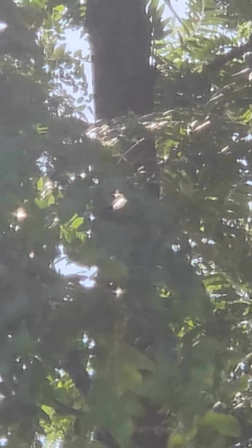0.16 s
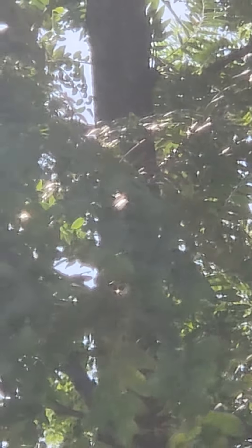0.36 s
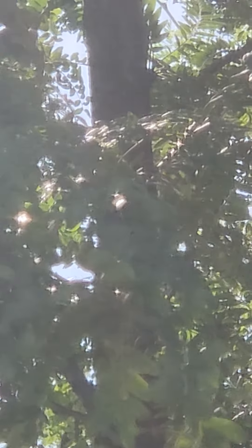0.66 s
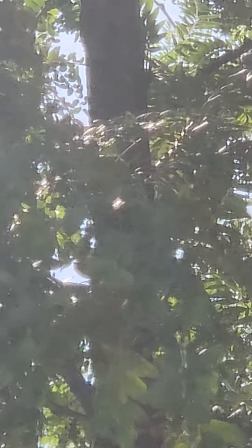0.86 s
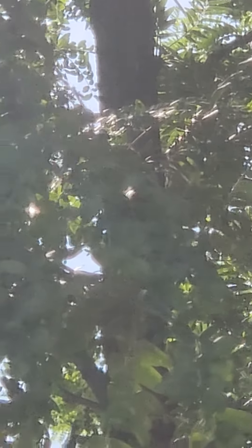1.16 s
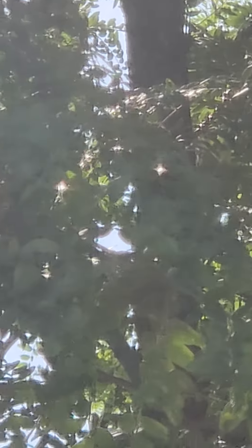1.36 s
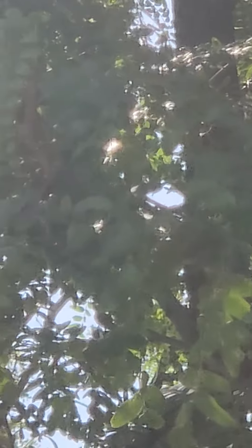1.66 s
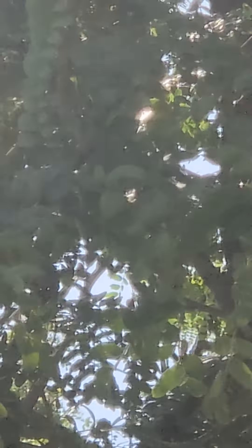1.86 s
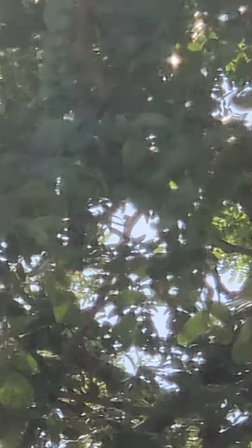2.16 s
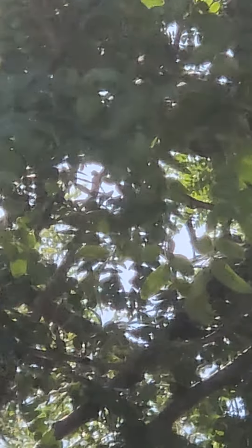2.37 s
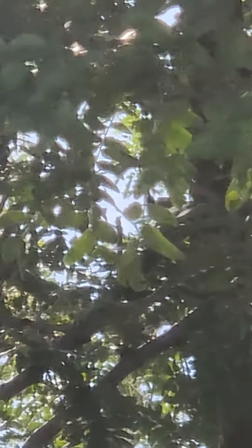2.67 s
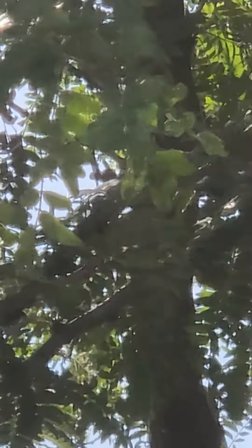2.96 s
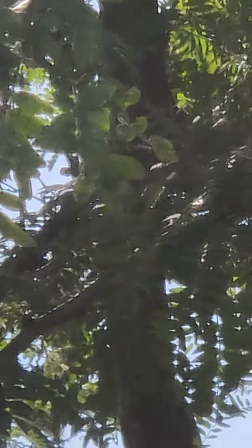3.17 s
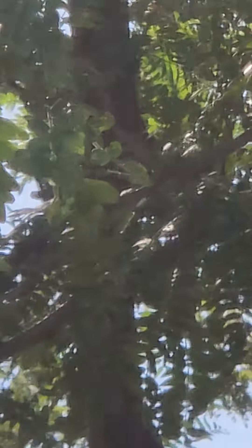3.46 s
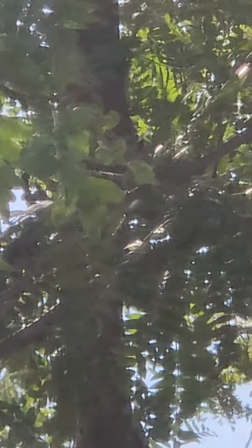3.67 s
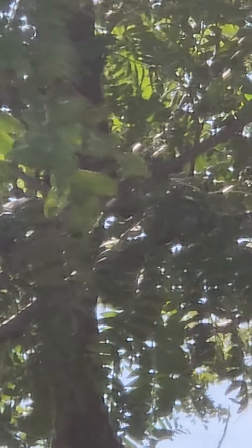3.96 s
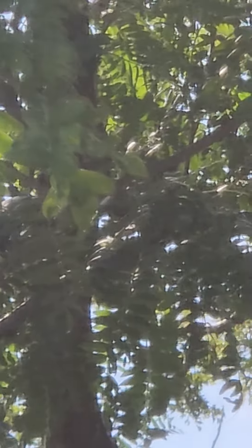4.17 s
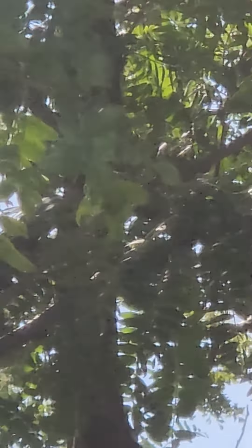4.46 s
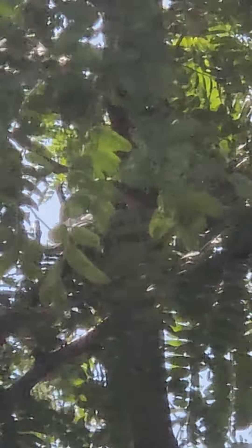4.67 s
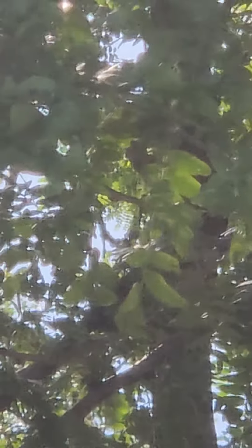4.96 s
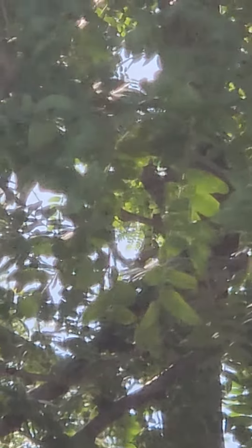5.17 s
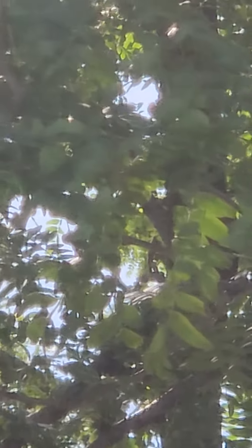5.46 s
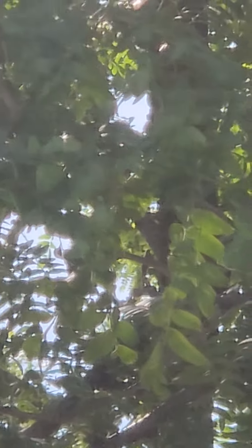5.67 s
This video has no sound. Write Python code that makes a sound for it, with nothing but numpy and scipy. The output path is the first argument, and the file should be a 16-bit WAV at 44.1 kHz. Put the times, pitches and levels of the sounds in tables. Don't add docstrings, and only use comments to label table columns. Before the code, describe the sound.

A close cricket chirps over soft low traffic rumble and a pulsing haze of insects, with a few faint piped bird notes. A jay then screams harshly at about one second, twice more around three, and once near the end, each call trailing into woodland scatter. Twigs snap around two seconds. Close stereo microphone among trees, turning slightly.

```python
import sys
import numpy as np
from scipy import signal
from scipy.fft import rfft, irfft
from scipy.io import wavfile
from scipy.ndimage import uniform_filter1d, minimum_filter1d

SR = 44100
rng = np.random.default_rng(int(sys.argv[2]) if len(sys.argv) > 2 else 0)


def transcribe(signal):
    frames = np.atleast_2d(signal).T
    limited = np.clip(frames, -1, 1)
    pcm = np.round(limited * 32767).astype(np.int16)
    wavfile.write(sys.argv[1], SR, pcm)


def natural_amplitude(level_db):
    exponent = np.asarray(level_db, float) / 20
    return 10 ** exponent


N = 256220


def at_hz(points, hz, column=1):
    points = np.array(points)
    return np.interp(np.log(np.maximum(hz, 1)), np.log(points[:, 0]), points[:, column])


def at_s(points, t):
    return np.interp(t, *np.transpose(points))


def rms_one(x):
    return x / np.sqrt(np.mean(x ** 2) + 1e-20)


def drift(rate, shape):
    t = np.arange(shape[-1]) * rate / SR
    knots = rng.standard_normal((*shape[:-1], 400))
    whole = t.astype(int) % 399
    part = t % 1
    return knots[..., whole] * (1 - part) + knots[..., whole + 1] * part


def panned(x, pan_db):
    return np.array([x * natural_amplitude(pan_db / 2), x * natural_amplitude(-pan_db / 2)])


def resonance(x, hz, width_hz):
    r = np.exp(-np.pi * width_hz / SR)
    zeros = np.array([1, 0, -1]) * (1 - r * r) / 2
    return signal.lfilter(zeros, [1, -2 * r * np.cos(2 * np.pi * hz / SR), r * r], x)


def double_resonance(x, hz, width_hz):
    return resonance(resonance(x, hz, width_hz), hz, width_hz)


CHIP_S = .007


def controls(scream, voice, chip_hz):
    start, end, second_db, pan_db, turn = scream
    t = np.arange(start, min(end, (N - 1) / SR), 1 / SR)
    s, *columns = np.transpose(voice)
    pitch_hz, effort_db, ring_db, rasp_db = [np.interp(t, s, c) for c in columns]
    unsettled = np.clip(1 - (t - start - CHIP_S) / .01, 0, 1)
    pitch_hz = pitch_hz + (chip_hz - pitch_hz) * unsettled
    rasp_db = rasp_db + (-11.0 - rasp_db) * np.sqrt(unsettled)
    effort_db = effort_db - 31 * np.clip(1 - (t - start) / 0.00073, 0, 1)
    shut_db = -20.5 * np.clip(1 - (end - t) / 0.02, 0, 1)
    clean_db = effort_db + shut_db - 10 * np.log10(1 + natural_amplitude(2 * rasp_db))
    fourth_db = effort_db + ring_db
    late_db = -14.5 * unsettled + shut_db
    second_db = second_db + 0.28 * (fourth_db - np.median(fourth_db)) + late_db
    return (t, pitch_hz, second_db, fourth_db + late_db, clean_db, clean_db + rasp_db,
            pan_db + turn * (t - start), unsettled)


def chaotic_swing(count, cycles):
    memory, beat_share = .62, .33
    own = rng.standard_normal((count, 500)) + 1j * rng.standard_normal((count, 500))
    own = signal.lfilter([np.sqrt(1 - memory ** 2)], [1, -memory], own)
    beat = rms_one(signal.lfilter([1], [1, .9, .9], rng.standard_normal(500)))
    swing = np.sqrt((1 - beat_share) / 2) * own + np.sqrt(beat_share) * beat
    whole, part = cycles.astype(int), cycles % 1
    return swing[:, whole] * (1 - part) + swing[:, whole + 1] * part


# (time [s], slip [Hz], width [s])
PITCH_SLIPS = [(1.162, -16.5, 0.0083), (1.259, -9, 0.032), (2.951, -17.5, 0.017), (3.012, 8.5, 0.007),
               (5.493, -8.5, 0.017), (5.522, 18, .015)]
# (time [s], level [dB])
DOUBLING = [(1.12, -75.5), (1.14, -52), (1.235, -45.5), (1.27, -74), (3.65, -72), (3.67, -54.5),
            (3.77, -44.5), (3.8, -67)]
# (frequency [Hz], level [dB])
RASP_COLOUR = [(2000, 6.5), (3000, 5.5), (4500, 6.5), (5500, -3), (8500, -2), (14000, -4)]


def call(course, throat, lead_s, shake_db=4.0):
    t, pitch_hz, second_db, fourth_db, stack_db, rasp_db, pan_db, unsettled = course
    wobble_db = 4.5
    pitch_hz = pitch_hz + sum(hz * np.exp(-((t - at) / width) ** 2) for at, hz, width in PITCH_SLIPS)
    chaos = np.clip(.12 + natural_amplitude(rasp_db - stack_db), 0, 2)
    steady = np.cumsum(pitch_hz * (1 + 0.00091 * drift(43.8, t.shape))) / SR
    cycles = steady + np.cumsum(pitch_hz * .008 * chaos * drift(160, t.shape)) / SR

    orders = np.arange(2, 27)[:, None]
    audible = orders * pitch_hz < .45 * SR
    phases = orders * cycles + rng.random(orders.shape)
    turns = audible * np.exp(2j * np.pi * phases) * np.sqrt(2)
    swing = chaotic_swing(len(orders), cycles)
    doubling = natural_amplitude(at_s(DOUBLING, t) + 15.5) * np.cos(np.pi * cycles)
    rasp_gain = natural_amplitude(rasp_db + 7.0 + wobble_db / 2 * drift(39.1, turns.shape))
    rasp = (turns * (rasp_gain * swing + doubling)).real.sum(0)

    second_gain = natural_amplitude(second_db + wobble_db / 3 * drift(30, t.shape))
    second = second_gain * np.sqrt(2) * np.cos(4 * np.pi * steady)
    shaken = 1 + natural_amplitude(shake_db + rasp_db - fourth_db) * swing[2]
    ringing = np.sqrt(2) * np.exp(4j * np.pi * (steady + cycles))
    fourth_gain = natural_amplitude(fourth_db + wobble_db / 3 * drift(53, t.shape))
    fourth = panned(fourth_gain * (shaken * ringing).real, pan_db)

    chip = np.sin(np.pi * np.clip((t - t[0]) / (CHIP_S + .003), 0, 1))
    chip = chip * ((orders == 8) + .6 * (abs(orders - 8) == 2))
    odd_mute_db = -20 * unsettled * (orders % 2)
    others = ((orders != 2) & (orders != 4)) * natural_amplitude(odd_mute_db + 14 * chip)

    hz = np.fft.rfftfreq(len(t), 1 / SR)
    windpipe = 1 / (1 + (2080 / np.maximum(hz, 1)) ** 14)
    out = np.zeros((2, len(t)))
    for side in range(2):
        leaves = natural_amplitude(wobble_db * drift(29.5, turns.shape))
        stack = (others * turns.real * leaves).sum(0) * natural_amplitude(stack_db + 1.0)
        source = rfft(stack) + rfft(rasp) * natural_amplitude(at_hz(RASP_COLOUR, hz))
        coloured = source * windpipe * natural_amplitude(at_hz(throat, hz, column=1 + side)) + rfft(fourth[side])
        late = -2j * np.pi * hz * lead_s * side
        low = rfft(second) * np.exp(late * 0.72)
        out[side] = irfft(coloured * np.exp(late) + low, len(t))
    return round(t[0] * SR), out


# (start [s], end [s], 2nd partial [dB], throat ring left-right at start [dB], head turn [dB/s])
SCREAMS = [
    (1.0598, 1.497, -38.5, 1, 12),
    (2.848, 3.233, -36.5, -11.5, 34),
    (3.5783, 3.974, -30.5, -7.5, 19),
    (5.419, 5.824, -33.5, -12, 18),
]
# (time [s], cycle rate [Hz], effort [dB], throat ring over effort [dB], rasp over clean partials [dB])
VOICE_1 = [(1.082, 796, -37, 23.5, 1), (1.109, 815, -33.5, 20, -13), (1.2, 808, -36, 22.5, -14),
           (1.27, 790.7, -30, 16.5, -22), (1.32, 781, -29.5, 17.5, -8), (1.402, 772.5, -32.5, 5.5, -5.5),
           (1.448, 736.5, -34.5, 20, -1.5), (1.478, 742, -47, 29.5, 3)]
VOICE_2 = [(2.871, 805, -37, 16, 5.5), (2.885, 831, -31, 18.5, -3), (2.92, 822, -39, 13, -15.5),
           (2.97, 813, -36, 24.5, -16.5), (3.075, 780, -32, 11, -24.5), (3.095, 777, -31.5, 7.5, 0),
           (3.17, 765.4, -32.5, 9, 18), (3.214, 731, -38, 17, 13.5)]
VOICE_3 = [(3.6, 803, -36, 21, 5), (3.619, 815.5, -31, 22, -31), (3.653, 804.5, -33.5, 25.7, -16),
           (3.681, 816, -34.5, 25.5, -7.5), (3.788, 785.4, -27.5, 10.5, -9), (3.812, 775, -31, 5.4, -7),
           (3.912, 765.6, -33.5, 5.2, 3), (3.96, 721, -39, 15.6, 32.5)]
VOICE_4 = [(5.439, 823, -31.5, 15, 5), (5.46, 833, -23.5, 13.5, -15), (5.53, 812.4, -29.5, 16.7, -29.5),
           (5.607, 783, -28.5, 11.8, -34.5), (5.627, 779.5, -27.5, 12.6, -11),
           (5.712, 784.7, -29.5, 9.1, 3), (5.772, 752, -32, 15, 15), (5.797, 709.5, -39.5, 13, 38)]
CHIP_HZ = [622, 612, 665, 595]
# (frequency [Hz], left [dB], right [dB])
THROATS = [
    [(2130, 1, -5), (2360, -2, 4), (3660, -5, -2), (5300, -8.5, 0), (8000, 3.5, 3.5), (9000, -44, -1),
     (11200, -11, -10.5), (15800, -11, -9)],
    [(2030, -4.5, -24), (2300, -4, 1), (4000, -5.5, -3.5), (4720, -16.5, 0), (7060, 4.5, 0.5),
     (8370, -7.5, -0.5), (11730, -17.5, -4.5), (15200, -16, -3.5)],
    [(2400, -1, 3), (4200, -1.5, 0), (4914, -19, 3.5), (5560, -3, -8), (7740, 7, -7), (7970, -21.5, 11.5),
     (11600, -23.5, -3.5), (15500, -28, -4)],
    [(2260, -3, 1), (4060, -8.5, -5), (5530, -20.5, -11), (6390, 2, -58), (7170, -25, 8), (7760, -10, 4),
     (10600, -31, -4), (15170, -19, -14)],
]
LEFT_LEADS_S = [0.0001687, 0.00022, 0.00024, 0.00021]


def jay():
    out = np.zeros((2, N))
    voices = (VOICE_1, VOICE_2, VOICE_3, VOICE_4)
    for scream, voice, chip_hz, throat, lead_s in zip(SCREAMS, voices, CHIP_HZ, THROATS, LEFT_LEADS_S):
        start, sound = call(controls(scream, voice, chip_hz), throat, lead_s)
        out[:, start:start + sound.shape[1]] += sound
    return out


# (frequency [Hz], 60 dB decay [s])
WOOD_T60 = [(1000, 0.577), (2300, 0.47), (3100, 1.15), (4500, 0.55), (7000, 0.33), (12000, 0.22)]


def woodland(x, far_db=-22.5):
    t = np.arange(SR) / SR
    near = rms_one(natural_amplitude(-60 * t / .12))
    echo = natural_amplitude(-22) * near * rng.standard_normal((2, SR))
    edges = np.geomspace(900, 16000, 13)
    for low, high in zip(edges, edges[1:]):
        bandpass = signal.butter(2, [low, high], "band", fs=SR, output="sos")
        band = signal.sosfilt(bandpass, rng.standard_normal((2, SR)))
        decay = rms_one(natural_amplitude(-60 * t / at_hz(WOOD_T60, np.sqrt(low * high))))
        echo = echo + natural_amplitude(far_db) * band * decay
    return signal.fftconvolve(x[[1]], echo / np.sqrt(SR), axes=1)[:, :N]


def note(length_s, from_hz, to_hz):
    u = np.linspace(0, 1, round(length_s * SR))
    swell = np.sin(np.pi * u) ** .6
    return swell * np.sin(2 * np.pi * np.cumsum(from_hz + (to_hz - from_hz) * u) / SR)


# (time [s], peak level [dB], stroke spacing [s])
CHIRPS = [(.012, -59.5, 0.037), (0.318, -54, 0.036), (0.611, -56.5, .039), (.917, -58.5, 0.036),
          (1.532, -54.5, 0.039), (2.131, -56, 0.04), (2.409, -54.5, 0.043), (2.694, -51, 0.043),
          (3.435, -49, .039), (4.202, -49.5, 0.037), (4.5, -51.5, .046), (4.795, -52, 0.04),
          (5.103, -54, 0.052)]
# (time [s], peak level [dB])
STRAYS = [(.2064, -71), (.866, -62), (1.9594, -64)]
# (time [s], left-right [dB])
CRICKET_PAN = [(0, 16), (2, 19), (2.4, 14), (5.8, -1)]


def cricket():
    out = np.zeros(N + SR)
    strokes = list(STRAYS)
    for s, db, gap in CHIRPS:
        strokes += [(s + k * gap, db - 2.5 * (k == 0)) for k in range(3)]
    for s, db in strokes:
        a, b = rng.standard_normal(2)
        stroke = note(0.03, 4720 + 25 * a, 4400 + 40 * b)
        u = np.linspace(0, 1, len(stroke))
        catch = 1 - .7 * np.exp(-((u - .52) / .07) ** 2)
        gain = natural_amplitude(db + 3.0 + 2 * drift(190, stroke.shape))
        out[round((s - .004) * SR):][:len(stroke)] += gain * stroke * catch
    return panned(out[:N], at_s(CRICKET_PAN, np.arange(N) / SR))


# (time [s], crack level [dB], tick level [dB], crack frequency [Hz], crack 60 dB decay [s])
TWIGS = [
    (1.882, -66, -62, 3000, .01),
    (1.982, -50, -72, 2500, .05),
    (2.033, -52, -58, 4000, .012),
    (2.185, -70, -60, 3000, .01),
    (2.21, -46, -58, 2000, .12),
    (4.549, -45, -74, 1600, .006),
]


def twigs():
    out, t = np.zeros((2, N)), np.arange(4000) / SR
    for s, crack_db, tick_db, hz, t60 in TWIGS:
        noise = rng.standard_normal((2, len(t)))
        tick = natural_amplitude(tick_db - 60 * t / 0.031) * np.diff(noise[0], prepend=0)
        crack = 3 * double_resonance(natural_amplitude(crack_db - 60 * t / t60) * noise[1], hz, hz)
        out[:, round(s * SR):][:, :len(t)] += tick + crack
    return out


# (time [s], length [s], from [Hz], to [Hz], level [dB])
FAR_NOTES = [(0.36, 0.096, 2290, 2210, -53.5), (.435, 0.027, 2900, 2960, -60),
             (0.476, .015, 3730, 3200, -54), (0.493, .03, 3010, 3000, -57), (.575, 0.037, 8500, 8600, -90),
             (4.693, 0.02, 1700, 2530, -86), (4.83, 0.085, 1800, 2500, -66), (5.035, .11, 2990, 2930, -62)]


def far_bird():
    out = np.zeros(N)
    for s, length_s, from_hz, to_hz, db in FAR_NOTES:
        piped = note(length_s, from_hz, to_hz)
        out[round(s * SR):][:len(piped)] += natural_amplitude(db - 2.5 + 4.6 * drift(87, piped.shape)) * piped
    return panned(out, 3.0)


def throb(counted, hz, width_hz, duty, level_db, pan_db):
    within = at_s(counted, np.arange(N) / SR) % 1
    gate = np.sin(np.pi * np.clip(within / duty, 0, 1))
    wing = rms_one(double_resonance(rng.standard_normal(N), hz, width_hz))
    return panned(natural_amplitude(level_db + 1.5 * drift(4, (N,))) * gate * wing, pan_db)


# (time [s], count [strokes])
HIGH_THROB = [(.024, 0), (2.376, 31), (4.368, 57), (5.312, 69), (5.94, 77)]
LOW_THROB = [(.026, 0), (5.89, 67)]


def tree_crickets():
    high = throb(HIGH_THROB, hz=7450, width_hz=160, duty=.42, level_db=-63, pan_db=8.0)
    low = throb(LOW_THROB, hz=6230, width_hz=100, duty=.4, level_db=-72.5, pan_db=4.0)
    return high + low


# (frequency [Hz], width [Hz], level [dB])
CHORUS = [(4490, 400, -61.5), (7320, 450, -62.5), (6160, 210, -74)]


def chorus():
    out = np.zeros((2, N))
    for hz, width_hz, db in CHORUS:
        band = rms_one(double_resonance(rng.standard_normal((2, N)), hz, width_hz))
        out += panned(0.92, 0.63)[:, None] * natural_amplitude(db + 1.6 * drift(43, (2, N))) * band
    return out


# (frequency [Hz], density [dB per Hz])
AIR_SPECTRUM = [(15, -25.5), (30, -8.5), (62, -1), (100, -11), (180, -13), (230, -21), (500, -26.5), (1000, -27),
                (1600, -33), (2500, -43),
                (4000, -51), (5600, -65), (8200, -63), (9000, -76)]
# (frequency [Hz], correlation [0-1])
LIKENESS = [(60, 0.95), (180, 1), (550, 0.69), (1650, 0.15), (4970, 0.12), (15000, 0.02)]
# (time [s], level [dB])
AIR_DB = [(0.0, -37), (0.31, -37), (0.47, -35.5), (0.9, -38), (1.15, -34.5), (1.45, -37.5), (3.66, -32.5),
          (3.69, -32.5), (5.81, -34.5)]
# (time [s], left-right [dB])
AIR_PAN = [(0, 5), (3.5, 1.5), (4.2, 1.2)]


def air(patchy_db=3.0):
    out, edges = 0, 14 * 2 ** np.arange(0, 9.6, .5)
    white = rng.standard_normal((2, 2, N + SR))
    for k, (low, high) in enumerate(zip(edges, edges[1:])):
        bandpass = signal.butter(3, [low, high], "band", fs=SR, output="sos")
        mid, side = signal.sosfilt(bandpass, white[k % 2])[:, SR:]
        hz = np.sqrt(low * high)
        alike = np.clip(at_hz(LIKENESS, hz), -1, 1)
        gain = natural_amplitude(at_hz(AIR_SPECTRUM, hz) + patchy_db * drift(14, (N,)))
        out = out + gain * (np.sqrt(1 + alike) * mid + np.sqrt(1 - alike) * side * [[1], [-1]])
    t = np.arange(N) / SR
    return panned(natural_amplitude(at_s(AIR_DB, t)), at_s(AIR_PAN, t)) * rms_one(out)


def scene():
    bird = jay()
    foliage = signal.ellip(8, 1, 50, 8150, fs=SR, output="sos")
    background = signal.sosfilt(foliage, cricket() + tree_crickets() + chorus() + air())
    return bird + woodland(bird) + background + far_bird() + twigs()


def top_cut(x):
    return signal.sosfilt(signal.butter(12, 16150, fs=SR, output="sos"), x)


def record(dry):
    hissed = dry + natural_amplitude(-85) * np.diff(rng.standard_normal(dry.shape), prepend=0)
    room_left = np.minimum(1, .99 / (np.abs(hissed).max(0) + 1e-9))
    gain = uniform_filter1d(minimum_filter1d(room_left, size=89), size=45)
    treble_cut = signal.cheby2(14, 30, 16200, fs=SR, output="sos")
    mix = signal.sosfiltfilt(treble_cut, hissed * gain)
    return top_cut(mix)


dry = scene()
out = record(dry)
transcribe(out)
```